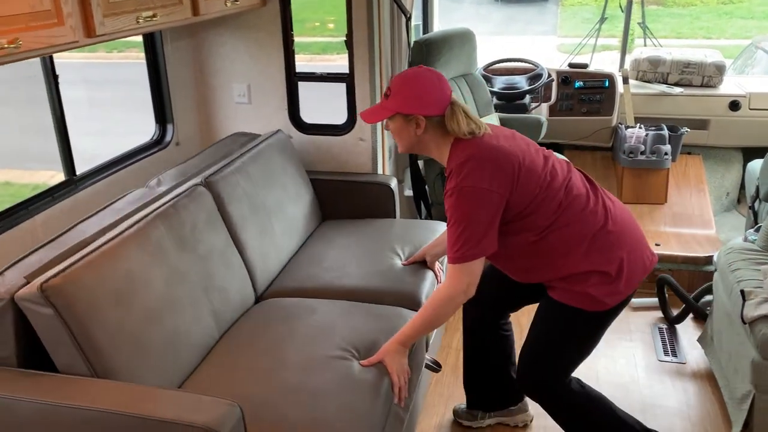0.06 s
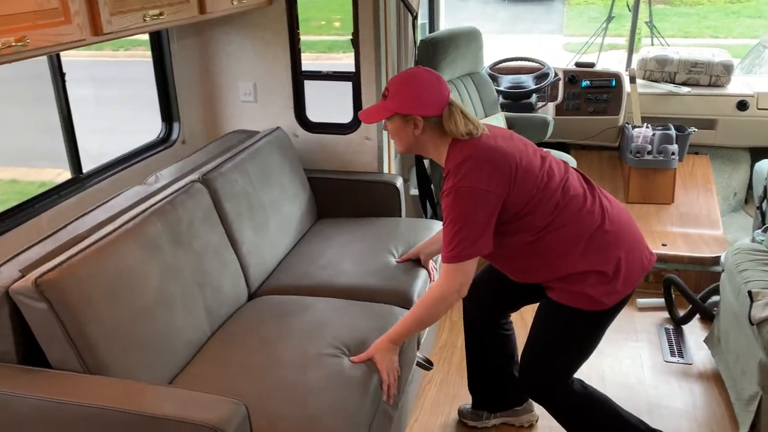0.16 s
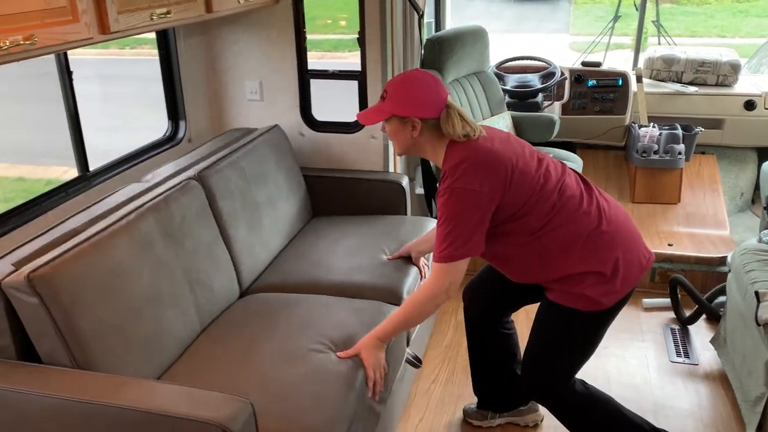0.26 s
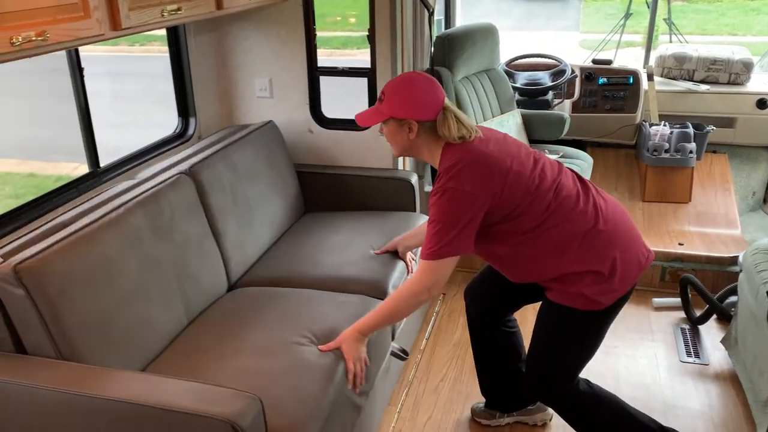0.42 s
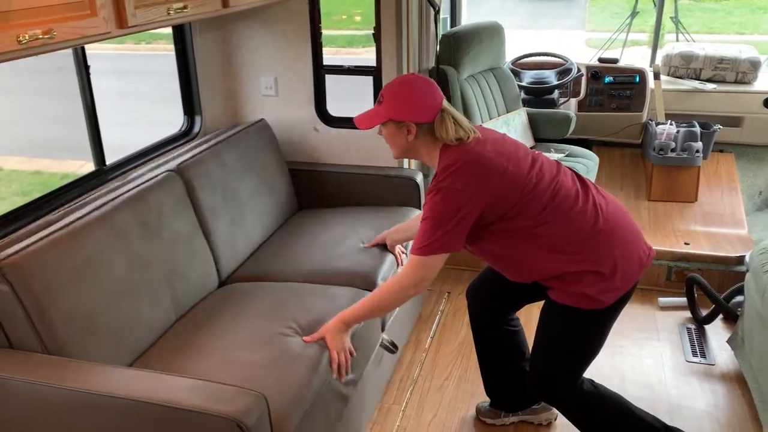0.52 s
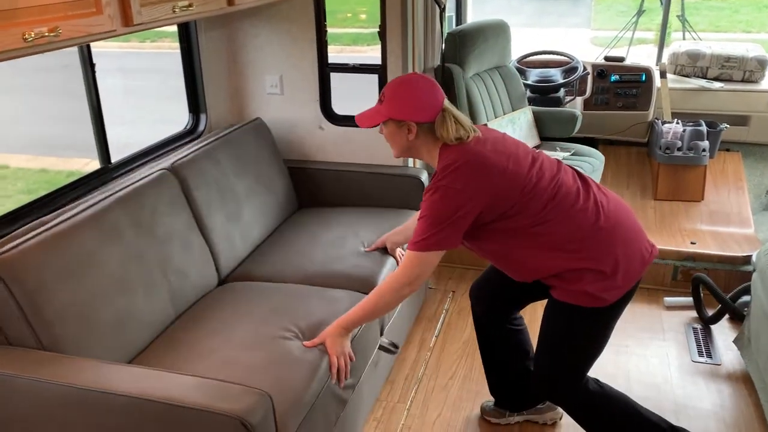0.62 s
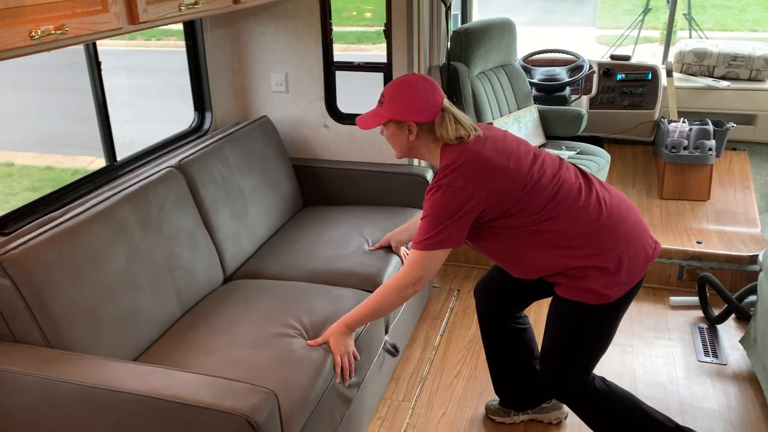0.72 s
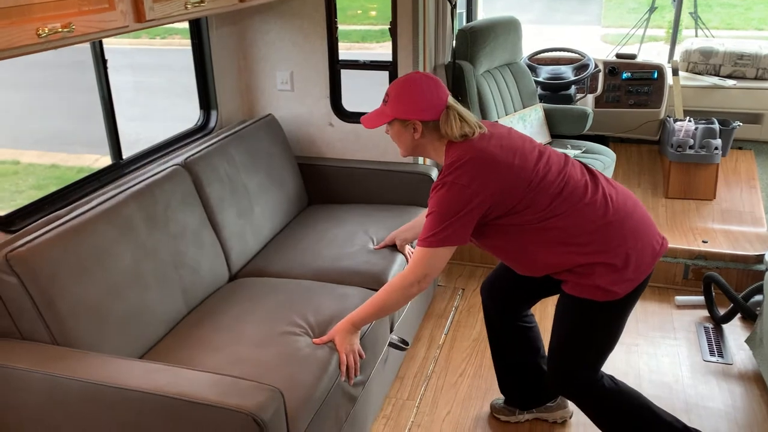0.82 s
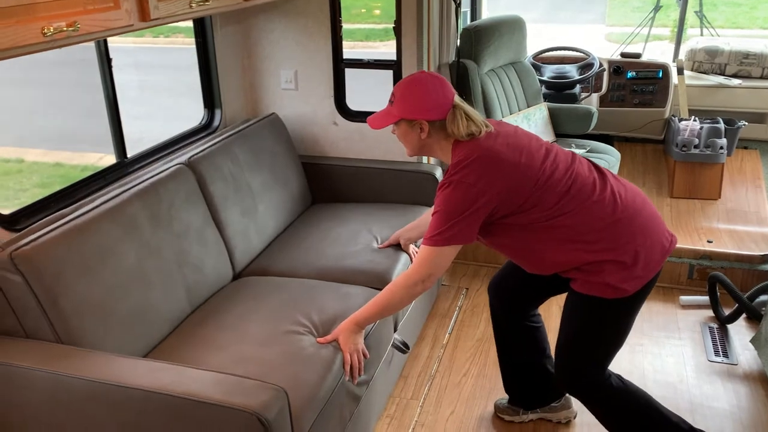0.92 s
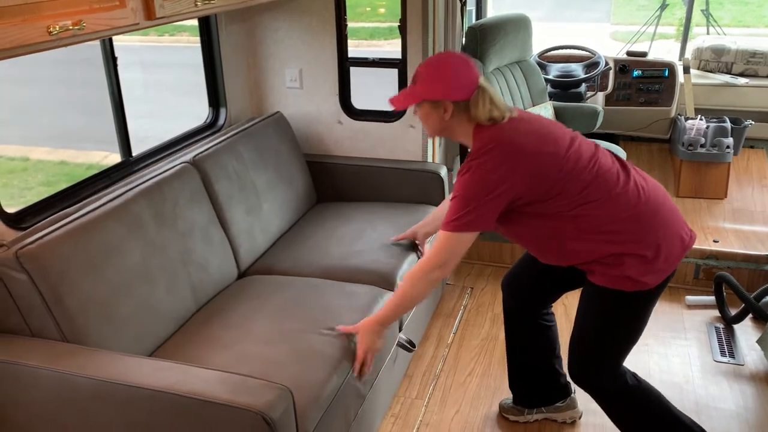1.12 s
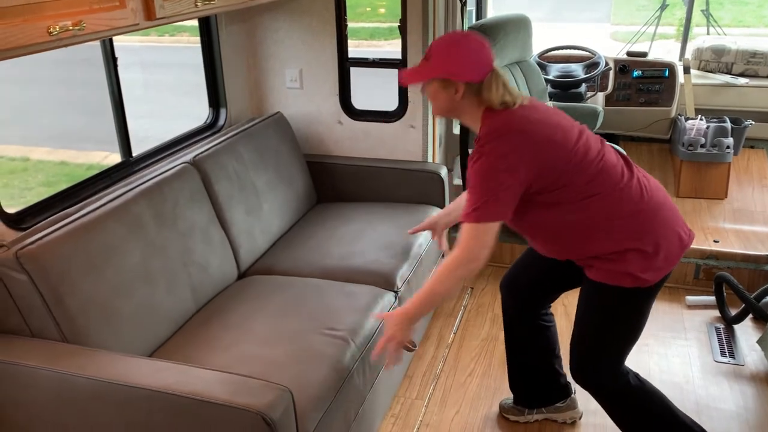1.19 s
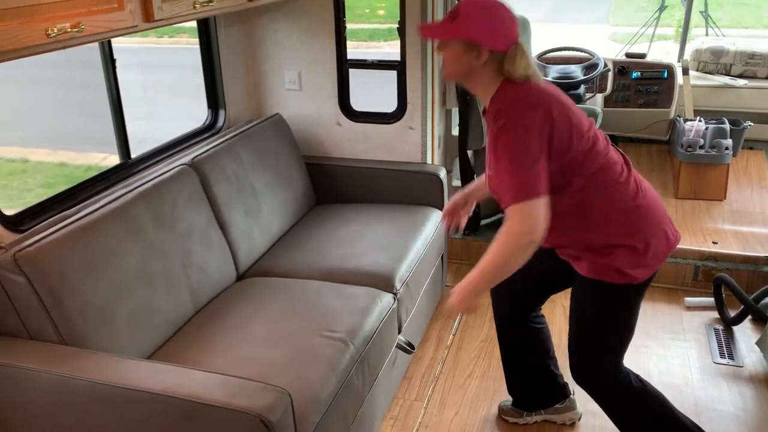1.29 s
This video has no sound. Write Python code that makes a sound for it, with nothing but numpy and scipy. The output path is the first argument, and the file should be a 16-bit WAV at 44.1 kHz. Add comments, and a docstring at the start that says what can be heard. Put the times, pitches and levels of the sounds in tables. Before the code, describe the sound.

A sofa bed is pushed shut inside a motorhome. Its frame judders and knocks, then slams into the latch with a booming clank and rattle. Springs ring on and upholstery rustles faintly, heard nearby over a low cabin rumble.

```python
"""A sofa bed is pushed shut inside a motorhome. Its frame sticks and slips along in a low judder,
the folding arm tips over, the hinge knocks, and the frame slams home into its latch. The weight booms
in the floor, the loose steel linkage rattles, scrapes and squeaks, and the springs ring on.
Then the upholstery rustles as the hands let go. A low cabin rumble lies under it all."""
import sys
import numpy as np
from scipy import signal
from scipy.fft import rfft, irfft, next_fast_len
from scipy.io import wavfile
from scipy.ndimage import uniform_filter1d

SR = 44100
rng = np.random.default_rng(int(sys.argv[2]) if len(sys.argv) > 2 else 0)


def wrap_up_sound(samples):
    """Save the sound to the file named by the first command line argument, as 16-bit audio."""
    columns = np.atleast_2d(samples).T
    # keep every value between -1 and 1, then stretch to whole-number steps
    tamed = np.clip(columns, -1, 1)
    steps = np.round(tamed * 32767).astype(np.int16)
    wavfile.write(sys.argv[1], SR, steps)


N = 59535
T = np.arange(N) / SR

# stick-slip of the sliding frame: time_s, slip_rate_hz, level_db
JUDDER = [(0.0, 80.6, -77), (0.041, 115.4, -33.5), (0.101, 123.4, -37), (0.15, 94.7, -33.5),
          (0.2, 88.7, -29), (0.27, 122, -28), (0.339, 104, -36.5), (0.45, 110, -38), (0.56, 120, -48),
          (0.68, 53, -77)]
# swell of the sliding rumble: time_s, level_db
SLIDE_LEVEL = [(0, -34), (0.15, -36), (0.3, -27), (0.42, -29.5), (0.55, -25.5), (0.70, -34.5),
               (0.82, -40.5), (0.97, -51.5), (1.15, -51), (1.20, -58.5), (1.35, -59.5)]
# colour of that rumble: frequency_hz, gain_db
SLIDE_COLOUR = [(20, -33.5), (50, 5), (100, -1.5), (200, -8), (350, -22.5), (800, -25.5), (1600, -36.5),
                (3300, -40), (5000, -48), (7000, -51.5), (15000, -62)]
# room tone of the cabin: frequency_hz, gain_db
CABIN_COLOUR = [(20, -10), (50, 4.5), (125, -1.5), (170, -11.5), (215, -7.5), (300, -23.5), (500, -36.5),
                (1500, -44.5), (5000, -46), (15000, -59.5)]
# booms in the floor and panels: start_s, pitch_hz, level_db, t60_s
THUMPS = [(0.012, 103.3, -32, 1), (0.174, 150, -24.5, 0.29), (0.227, 214.4, -17, 0.2),
          (0.249, 87.4, -9, 0.21), (0.320, 61.4, -21.5, 0.52), (0.459, 43.8, -13.5, 0.24),
          (0.559, 272, -25, 0.12), (0.567, 161.4, -10, 0.25), (0.587, 58.4, -1.5, 0.26),
          (0.673, 100, -18, 0.15), (0.767, 47.5, -25, 0.43), (0.914, 65.4, -31.5, 0.14)]
# blows of the frame: start_s, level_db, extra_bass_db, extra_treble_db, rattle_s, pan_left_db
BLOWS = [(0.2233, -30.5, 13, -11, 0.0057, -0.5), (0.238, -32, 9, -0.5, 0.012, -1),
         (0.263, -41.5, -3.5, 0, 0.017, 5.5), (0.306, -46.5, -8.5, -12, 0.006, -13),
         (0.469, -33.5, 7.5, -3.5, 0.0025, 1.5), (0.493, -41.5, -10.5, 2, 0.029, 3),
         (0.558, -25, 1.5, -2, 0.013, 0.5), (0.5751, -18, 5.5, -7.5, 0.0011, -1),
         (0.584, -14, -3.5, -8.5, 0.0025, 4), (0.5967, -15, -3, 4.5, .0012, 0.5),
         (0.609, -21, -4.5, 7.5, .002, -1), (0.621, -26.5, -2, 0.5, 0.0017, -0.5),
         (0.737, -42, -2, -1.5, 0.013, -1), (0.92, -51, -1.5, 0.5, 0.002, -2),
         (0.995, -51.5, -8, -2, 0.027, 0.5), (1.084, -56.5, 13, 17, 0.0074, 0.5)]
# colour of a blow: band_hz, gain_db
BLOW_COLOUR = [(90, -8.5), (160, -7.5), (330, -6.5), (600, -5.5), (1100, -4.5), (1600, -11.5), (2600, -9),
               (3700, -10.5), (6000, -21), (8500, -14), (13000, -14.5), (16000, -26)]
# its tail in the cabin: band_hz, t60_s
BLOW_DECAY = [(100, 0.34), (400, 0.17), (1000, 0.17), (3000, 0.26), (12000, 0.16)]
# dull knocks of the folding arm: start_s, level_db
ARM_KNOCKS = [(0.2248, -20), (0.2355, -18.5)]
# body of those knocks: pitch_hz, level_db, t60_s
ARM_BODY_MODES = [(295.4, -1, 0.13), (413.2, 2, 0.23), (483, -10, .12), (794, -15, 0.14), (935, -9, 0.083)]
# jolts to the arm's steel: start_s, level_db
ARM_JOLTS = [(0.23, -44), (0.256, -42)]
# ring of that steel: pitch_hz, base_level_db, base_t60_s
ARM_STEEL_MODES = [(2369, -1, .28), (2552, -3, .55), (2683, -4, .7), (2790, -4, .4), (2945, -4, .3),
                   (3355, -1, .33), (3661, 3, .26), (3830, -2, .25), (3938, 0, .25)]
# scrapes of the linkage: start_s, length_s, centre_hz, width_hz, level_db
SCRAPES = [(0.228, 0.088, 3600, 595, -43.5), (0.244, 0.058, 8120, 400, -53),
           (0.454, 0.057, 1910, 248, -41.5), (0.582, 0.006, 3700, 892, -23.5),
           (0.989, 0.12, 2010, 690, -63)]
# squeaks of the linkage: start_s, length_s, pitch_hz, level_db
SQUEAKS = [(0.405, 0.013, 4470, -54), (0.425, 0.039, 4570, -58), (1.016, 0.04, 3770, -59)]
# knocks of the hinge: start_s, level_db
HINGE_KNOCKS = [(0.4365, -22.5), (0.4445, -23)]
# hollow tone of the hinge: pitch_hz, level_db, t60_s
HINGE_MODES = [(500, -9.5, 0.079), (623.4, -11, 0.16), (693, 3, 0.23), (929, -4.5, 0.15),
               (1261, -6.5, 0.045)]
# jolts to the springs: start_s, level_db
SPRING_JOLTS = [(0.47, -54.5), (0.598, -30.5)]
# ring of the springs: pitch_hz, base_level_db, t60_s
SPRING_MODES = [(2375, -14, .6), (2422, -11, .5), (2452, -13, .5), (2482, -7, .7), (2530, -13, .5),
                (2579, -0.5, .68), (2610, -7, .55), (2681, -15, .55), (3531, -11, .6), (3784, -20, .5),
                (3880, -21, .5), (4592, -15, .65), (4765, -19, .6), (4856, -15, .9), (4947, -22, .6),
                (4990, -17, .7), (5254, -21, .7), (5952, -18, .6), (5978, -26, .6)]
# clanks of the frame slamming home: start_s, level_db
CLANKS = [(0.5768, -21), (0.584, -11), (0.599, -13)]
# ring of the frame: pitch_hz, base_level_db, base_t60_s
FRAME_MODES = [(215, -7, .25), (300, -4, .27), (370, -3, .22), (565, -9, .2), (614, -9, .2), (673, -9, .2),
               (774, -7, .2), (893, -10, .2), (959, -7, .22), (1039, -7, .2), (1084, -2, .2),
               (1205, -9, .18), (1259, -3, .2), (1335, -7, .2), (1717, -14, .3), (1835, -12, .26)]
# snaps of the latch: start_s, level_db
SNAPS = [(0.584, -27), (0.6, -19), (0.6285, -22.5)]
# ring of the latch: pitch_hz, base_level_db, base_t60_s
LATCH_MODES = [(2080, -8, .27), (2476, -6, .3), (2610, -3, .33), (2768, 0, .33), (3045, -6, .22),
               (3187, -8, .25), (3250, -8, .22), (3876, -9, .28), (4090, -11, .24)]
# rustles of the upholstery: start_s, length_s, level_db
RUSTLES = [(1.076, 0.092, -56.5), (1.259, 0.063, -59.5), (1.304, 0.087, -63)]
# colour of the cloth: frequency_hz, gain_db
RUSTLE_COLOUR = [(150, -18), (500, -4.5), (1500, -8.5), (4000, -13.5), (7000, -13.5), (14000, -17)]
# stereo width: frequency_hz, side_over_mid_db
WIDTH = [(60, -21), (250, -15.5), (500, -7), (1000, -2), (2000, -3), (4000, 0), (10000, 0.5)]
# stereo lean: frequency_hz, left_over_right_db
BALANCE = [(40, -5.5), (130, -0.5), (250, -5), (500, 1), (1000, 1), (2500, -.5), (8000, -1.5)]

BASS_HZ, TREBLE_HZ = 516, 4430  # shelf corners
LEFT_RIGHT = np.array([[1], [-1]])
POWER_FALL = np.log(10 ** 6)  # time constants in a 60 dB fall of power


def undb(db):
    """Decibels to gain."""
    return 10 ** (np.asarray(db) / 20)


def at(hz, points):
    """Read a curve on a log-frequency axis."""
    f, v = np.array(points).T
    return np.interp(np.log(hz + 1e-9), np.log(f), v)


def unit(x):
    """Scale to rms 1."""
    return x / np.sqrt(np.mean(x ** 2))


def shape(x, gain):
    """Filter by a gain given as a function of frequency."""
    size = next_fast_len(N + N // 4)
    return irfft(rfft(x, size) * gain(np.arange(size // 2 + 1) * SR / size), size)[..., :N]


def resonance(hz, width_hz):
    """Gain curve of one resonance."""
    return lambda f: 1 / (1 + (2 * (f - hz) / width_hz) ** 2)


def steel(f, depth_db=4.5, spacing_hz=45):
    """Gain curve of the linkage's close, irregular resonances."""
    peaks = rng.standard_normal(4096)
    ripple = np.interp(f / spacing_hz, np.arange(len(peaks)), peaks)
    return undb(depth_db * f / (f + BASS_HZ) * ripple)


def stereo_noise():
    """White noise, narrow in the bass and wide in the treble."""
    mid, side = rng.standard_normal((2, N))
    pair = mid + LEFT_RIGHT * shape(side, lambda f: undb(at(f, WIDTH)))
    return shape(pair, lambda f: 1 / np.hypot(1, undb(at(f, WIDTH))))


def noise(colour):
    """Stereo noise of a given colour, rms 1."""
    return unit(shape(stereo_noise(), lambda f: undb(at(f, colour))))


def wander(rate_hz):
    """Smooth random motion, rms 1."""
    return unit(shape(rng.standard_normal(N), lambda f: np.exp(-(f / rate_hz) ** 2)))


def flutter(rate_hz, depth_db):
    """Random flutter of level, rms 1."""
    return unit(undb(depth_db * wander(rate_hz)))


def arch(start, length):
    """A half-sine swell."""
    return np.sin(np.pi * np.clip((T - start) / length, 0, 1))


def fade(x, seconds):
    """Give every input an exponential tail."""
    return signal.lfilter([1], [1, -np.exp(-1 / (SR * max(seconds, 1 / SR)))], x)


def contacts(start, length):
    """Share of a blow's energy that arrives in each sample."""
    return (T > start) * np.exp(-np.maximum(T - start, 0) / length) / (length * SR)


def energy(hits, contact_s):
    """Stream of energy from brief hits."""
    return sum(undb(db) ** 2 * contacts(start, contact_s) for start, db in hits)


def spread(k, hz):
    """Left and right phase of mode k: high modes sit wider."""
    return (-1) ** k * np.arctan(undb(at(hz, WIDTH))) * LEFT_RIGHT


def ring(modes, start, attack_s=0.0034):
    """Modes struck once and left to decay."""
    age, out = np.maximum(T - start, 0), 0
    for k, (hz, db, t60) in enumerate(modes):
        decay = np.exp(-np.log(1000) * age / t60)
        out += undb(db) * decay * np.sin(2 * np.pi * hz * age + spread(k, hz))
    return out * (1 - np.exp(-age / attack_s))


def sing(modes, power, tilt_db, t60_scale=1, waver_cycles=0.083):
    """Wavering steel modes fed by a stream of energy, tilted per octave about 1 kHz."""
    out = 0
    for k, (hz, db, t60) in enumerate(modes):
        phase = 2 * np.pi * (hz * T + waver_cycles * wander(36))
        envelope = np.sqrt(fade(power, t60_scale * t60 / POWER_FALL)) * flutter(25, 1.7)
        level = undb(db + tilt_db * np.log2(hz / 1000))
        out += level * envelope * np.sin(phase + spread(k, hz))
    return out


def sliding(body_hz=184, jitter=0.055, panel_boost_db=8.5):
    """The frame sticks and slips over a lurching rumble, coloured by a hollow panel under the seat."""
    times, slip_hz, db = np.array(JUDDER).T
    cycles = np.cumsum(np.interp(T, times, slip_hz) * (1 + jitter * wander(66))) / SR
    slips = np.diff(np.floor(cycles), prepend=0) * flutter(70, 5.1)
    judder = unit(shape(slips, lambda f: (f / body_hz) ** 2 / (1 + (f / body_hz) ** 2) ** 4))
    judder *= undb(np.interp(T, times, db))
    rub = noise(SLIDE_COLOUR)
    bass = shape(rub, lambda f: 1 / (1 + (f / BASS_HZ) ** 2))
    rumble = bass * flutter(77, 1.9) + (rub - bass) * flutter(60, 1.0)
    rumble *= undb(np.interp(T, *np.array(SLIDE_LEVEL).T))
    panel = resonance(438, width_hz=63)
    return shape(judder + rumble, lambda f: undb(panel_boost_db * panel(f)))


def cabin(level_db=-54.5):
    """A steady bed of low room tone."""
    return undb(level_db) * noise(CABIN_COLOUR)


def floor_booms(attack_cycles=0.77):
    """The sofa's weight booms in the floor and panels, at a pitch set by where it lands."""
    out = 0
    for start, hz, db, t60 in THUMPS:
        attack = 1 - np.exp(-((T - start) * hz / attack_cycles) ** 2)
        out += ring([(hz, db, t60)], start) * attack
    return out


def clatter(crack_db=-13, crack_s=0.001):
    """Each blow is a crack and a brief rattle of loose steel that dies in the cabin, band by band."""
    hiss, out = shape(stereo_noise(), steel), 0
    start, db, bass_db, treble_db, rattle_s, pan_db = np.array(BLOWS).T[:, :, None]
    rattles, cracks = contacts(start, rattle_s), contacts(start, crack_s)
    for hz in 88 * 2 ** (np.arange(16) / 2):
        def half_octave(f):
            distance = abs(2 * np.log2(f / hz + 1e-9))
            return np.cos(np.pi / 2 * np.minimum(distance, 1)) ** 2
        band = unit(shape(hiss, half_octave))
        shelves_db = bass_db / (1 + (hz / BASS_HZ) ** 2) + treble_db / (1 + (TREBLE_HZ / hz) ** 2)
        level_db = db + at(hz, BLOW_COLOUR) + shelves_db
        power = undb(level_db.T + LEFT_RIGHT * pan_db.T / 2) ** 2
        tail = fade(power @ rattles, at(hz, BLOW_DECAY) / POWER_FALL)
        crack = undb(crack_db) ** 2 * (power @ cracks) * crack_s * SR
        out += band * np.sqrt(tail + crack)
    return out * flutter(450, 0.5)


def folding_arm():
    """The arm tips over with a dull double knock, and its steel rings on."""
    knocks = sum(undb(db) * ring(ARM_BODY_MODES, start) for start, db in ARM_KNOCKS)
    jolts = energy(ARM_JOLTS, contact_s=0.0093)
    return knocks + sing(ARM_STEEL_MODES, jolts, tilt_db=-1.0, t60_scale=0.9)


def scrapes():
    """Steel rubs on steel: gritty bursts, each in one resonance."""
    out = 0
    for start, length, hz, width_hz, db in SCRAPES:
        grit = unit(shape(stereo_noise(), resonance(hz, width_hz)))
        out += undb(db) * arch(start, length) * grit
    return out * flutter(330, 1.0)


def squeaks():
    """The linkage gives thin squeaks with a shaky pitch."""
    out = 0
    for start, length, hz, db in SQUEAKS:
        pitch = hz * flutter(260, 0.089)
        out += undb(db) * arch(start, length) * np.sin(2 * np.pi * np.cumsum(pitch) / SR)
    return out


def hinge():
    """Two quick contacts make a hollow double knock."""
    return sum(undb(db) * ring(HINGE_MODES, start) for start, db in HINGE_KNOCKS)


def springs(buzz_db=-18, buzz_t60_s=0.81, mute_at_s=1.08, mute_fade_s=0.05):
    """The jolted springs sing on, beating unevenly and buzzing, until the cushion mutes them."""
    jolts = energy(SPRING_JOLTS, contact_s=0.015)
    tones = sing(SPRING_MODES, jolts, tilt_db=2.5, waver_cycles=0.06)
    hiss = shape(stereo_noise(), steel)
    coils = unit(shape(hiss, resonance(5700, width_hz=1200)))
    buzz = undb(buzz_db) * coils * np.sqrt(fade(jolts, buzz_t60_s / POWER_FALL))
    mute = np.exp(-np.maximum(T - mute_at_s, 0) / mute_fade_s)
    return (tones + buzz) * flutter(37, 0.61) * mute


def frame_slam():
    """The frame clanks home in quick steps; loose joints make its tones waver."""
    return sing(FRAME_MODES, energy(CLANKS, contact_s=0.002), tilt_db=0.3, t60_scale=0.82)


def latch():
    """The latch snaps in with a bright ring."""
    return sing(LATCH_MODES, energy(SNAPS, contact_s=0.0016), tilt_db=-0.1, t60_scale=0.67)


def upholstery(tail_s=0.008):
    """Short crinkly swishes of the cushion covers die away in the cabin."""
    swells = sum(undb(db) * arch(start, length) for start, length, db in RUSTLES)
    envelope = np.sqrt(fade(swells ** 2, tail_s) / (tail_s * SR))
    return envelope * noise(RUSTLE_COLOUR) * flutter(325, 2.3)


def scene():
    """All parts of the sofa over the room tone, leaning left or right by frequency."""
    mix = clatter() + folding_arm() + frame_slam() + latch() + springs() + floor_booms()
    mix += hinge() + squeaks() + scrapes() + sliding() + upholstery() + cabin()
    return shape(mix, lambda f: undb(LEFT_RIGHT * at(f, BALANCE) / 2))


def record(dry, threshold_db=-3.5, ratio=1.5, release_s=0.38, ceiling=0.9, top_hz=15700):
    """Gentle compression ducks the slam, a soft clip rounds the peaks and a low-pass cuts the top."""
    release = np.exp(-T / release_s)
    peak = np.maximum.accumulate(abs(dry).max(axis=0) / release) * release
    overshoot = np.maximum(uniform_filter1d(peak, size=64) / undb(threshold_db), 1)
    ducked = dry * overshoot ** (1 / ratio - 1)
    rounded = ducked / (1 + (ducked / ceiling) ** 6) ** (1 / 6)
    return signal.sosfilt(signal.ellip(8, .2, 80, top_hz, fs=SR, output="sos"), rounded)


dry = scene()
out = record(dry)
wrap_up_sound(out)
```